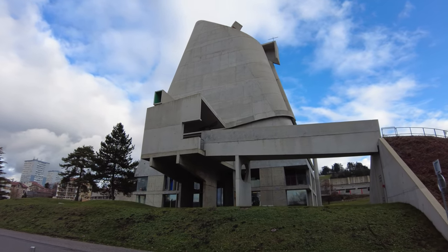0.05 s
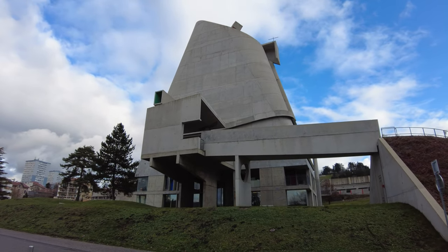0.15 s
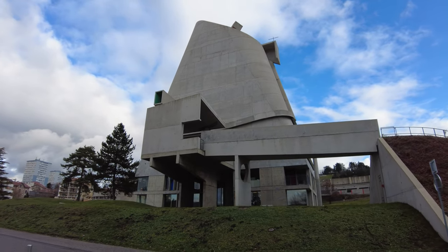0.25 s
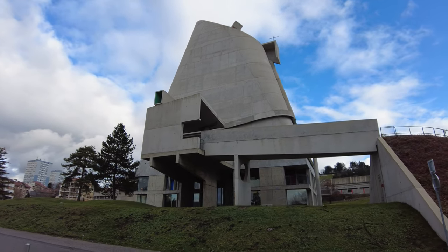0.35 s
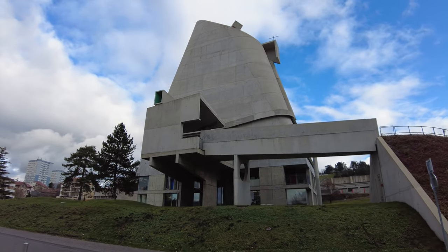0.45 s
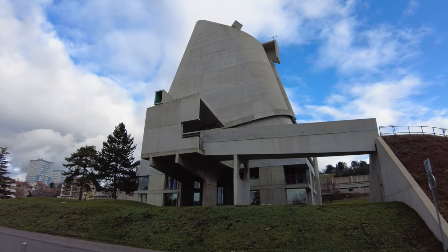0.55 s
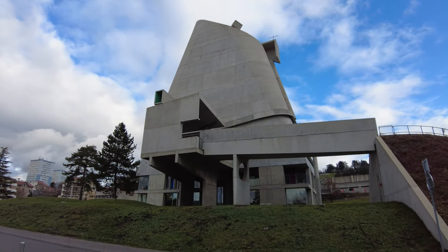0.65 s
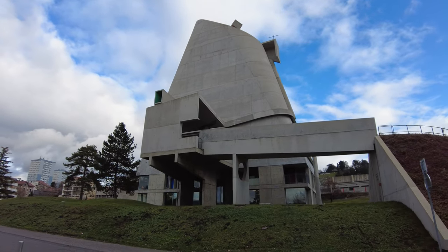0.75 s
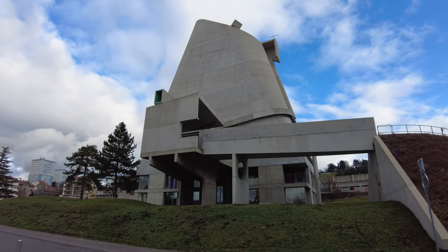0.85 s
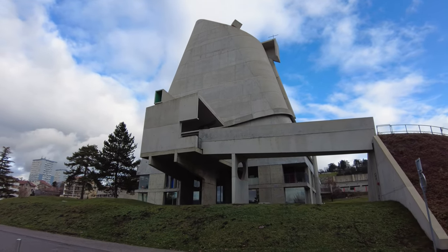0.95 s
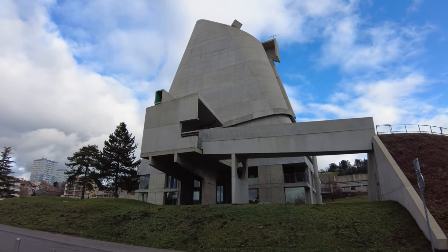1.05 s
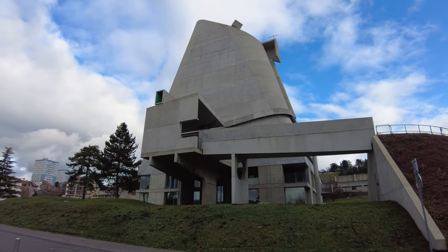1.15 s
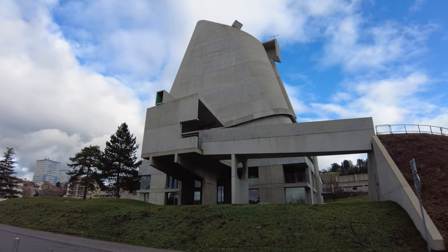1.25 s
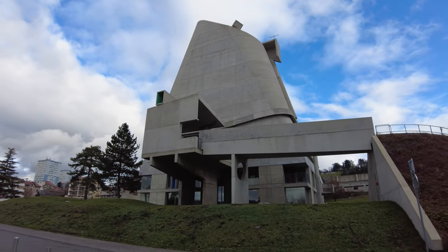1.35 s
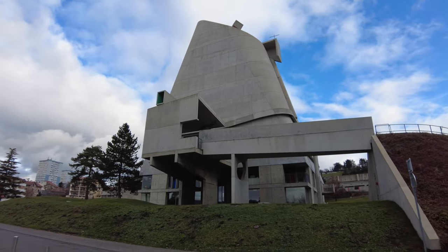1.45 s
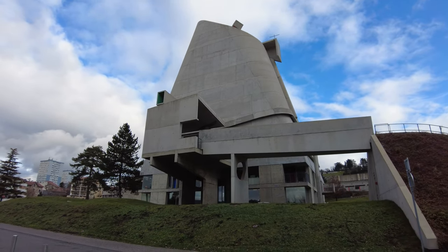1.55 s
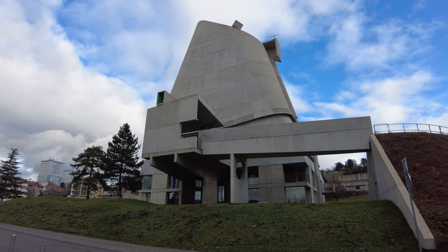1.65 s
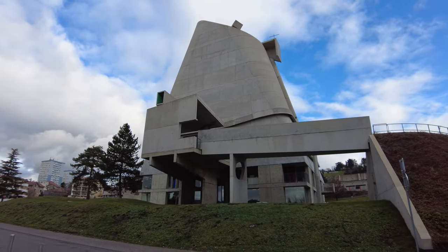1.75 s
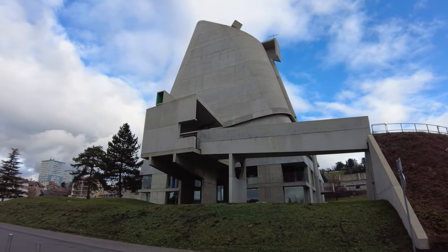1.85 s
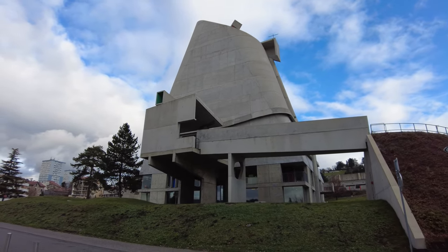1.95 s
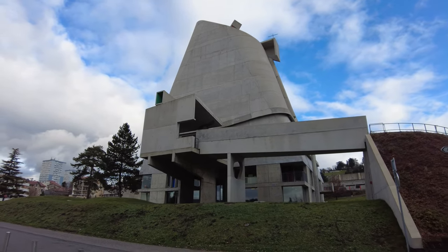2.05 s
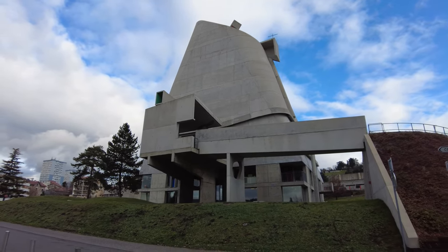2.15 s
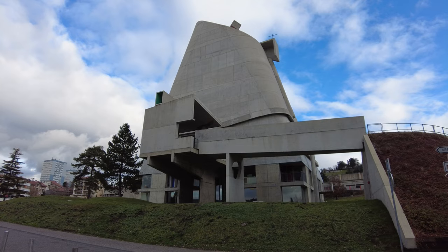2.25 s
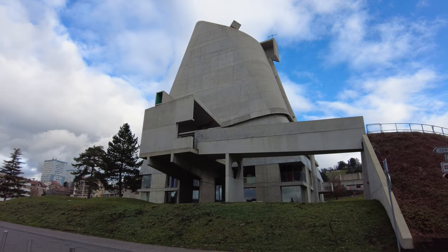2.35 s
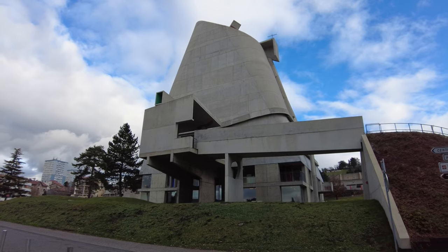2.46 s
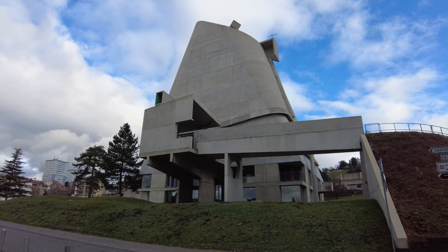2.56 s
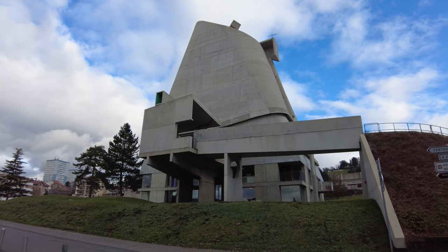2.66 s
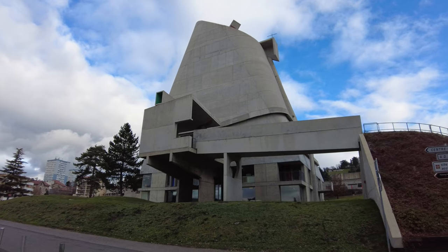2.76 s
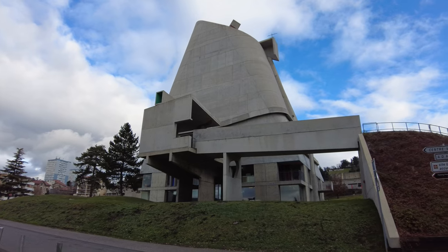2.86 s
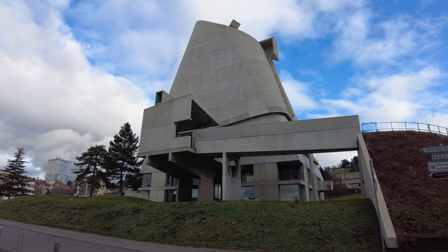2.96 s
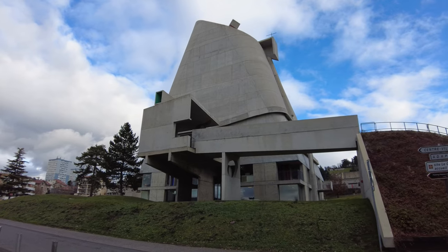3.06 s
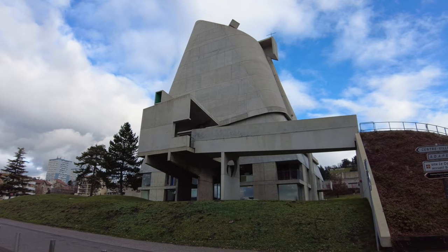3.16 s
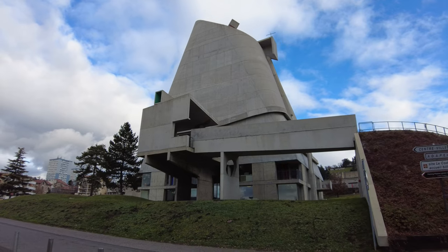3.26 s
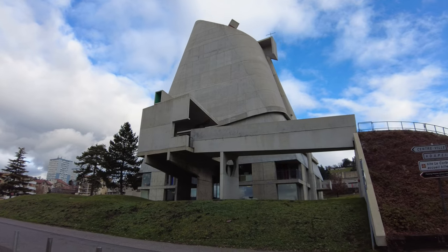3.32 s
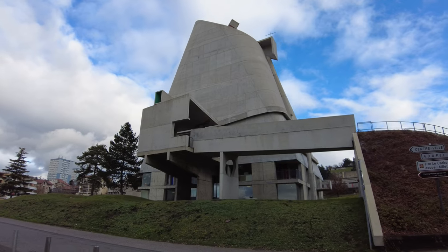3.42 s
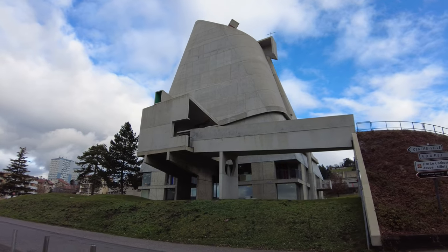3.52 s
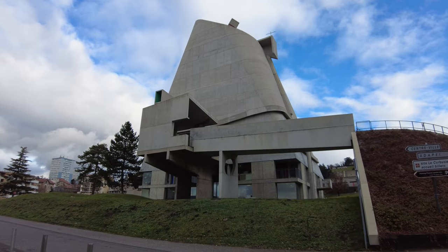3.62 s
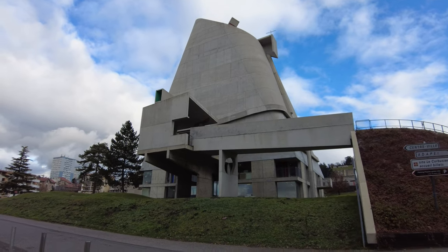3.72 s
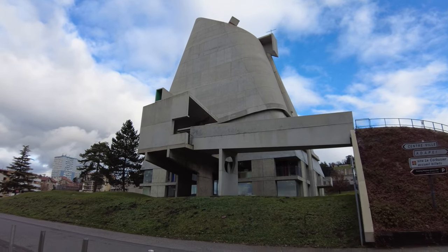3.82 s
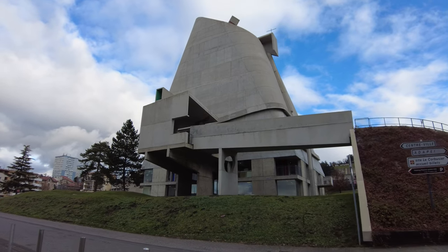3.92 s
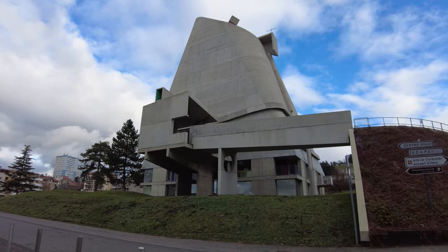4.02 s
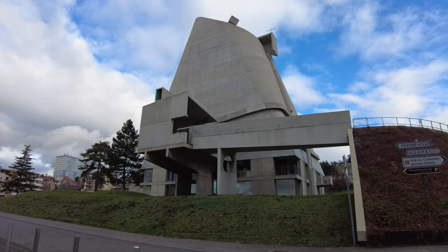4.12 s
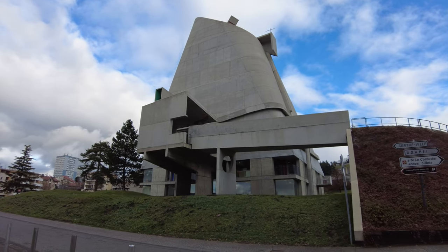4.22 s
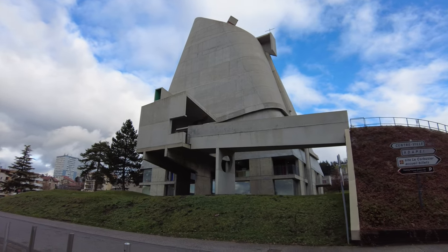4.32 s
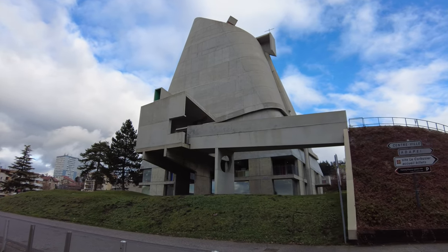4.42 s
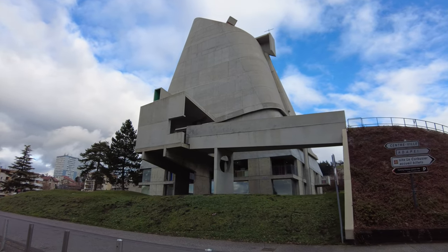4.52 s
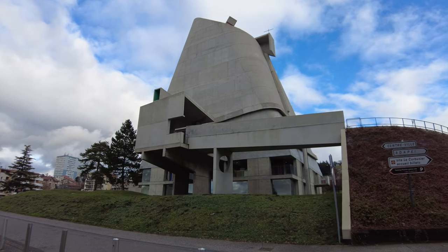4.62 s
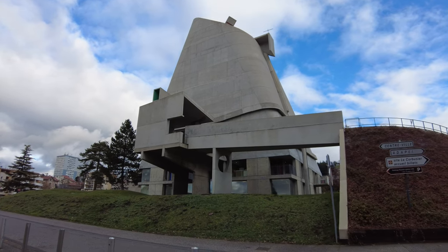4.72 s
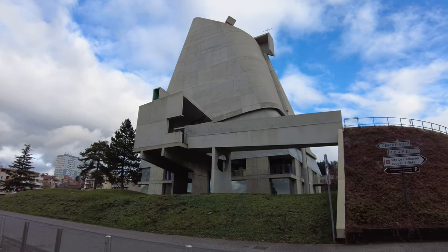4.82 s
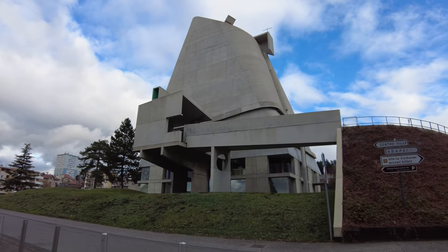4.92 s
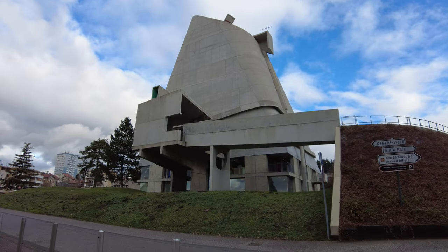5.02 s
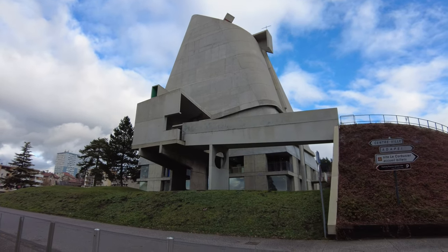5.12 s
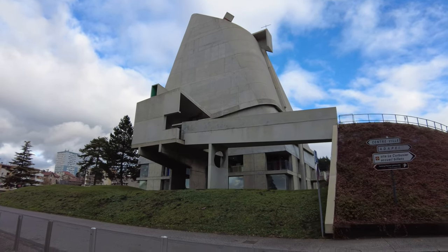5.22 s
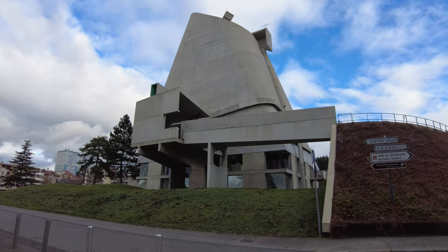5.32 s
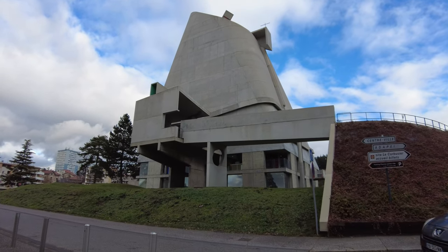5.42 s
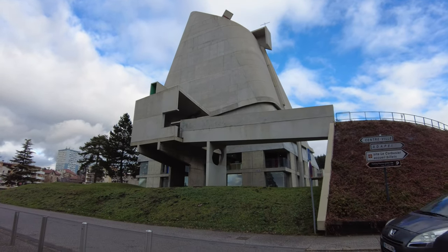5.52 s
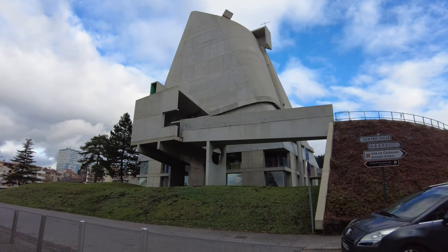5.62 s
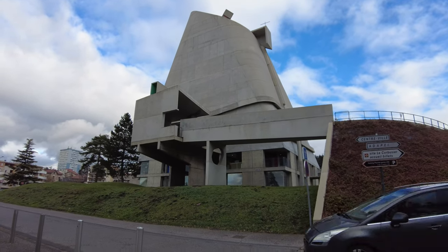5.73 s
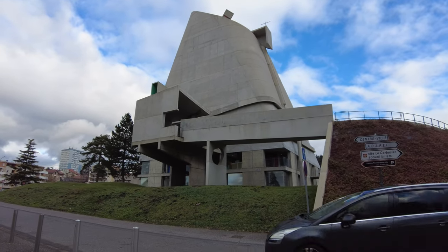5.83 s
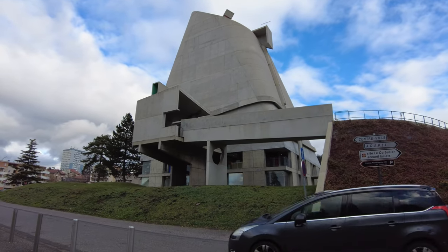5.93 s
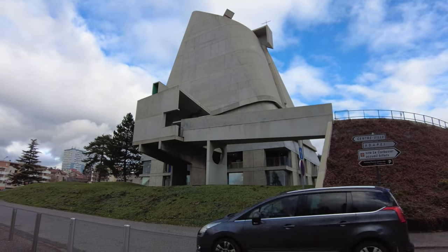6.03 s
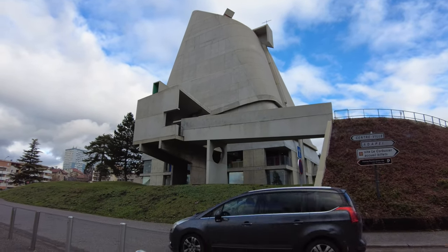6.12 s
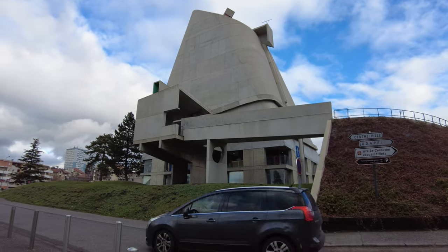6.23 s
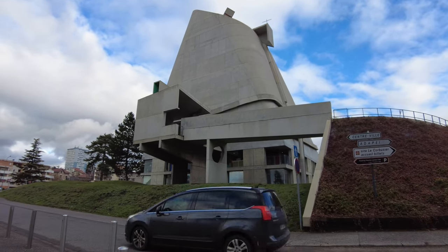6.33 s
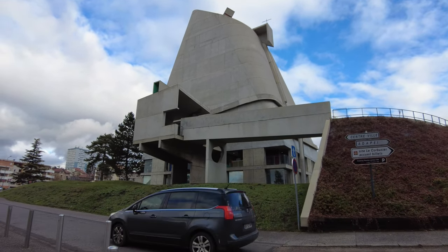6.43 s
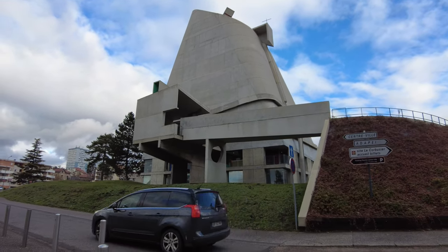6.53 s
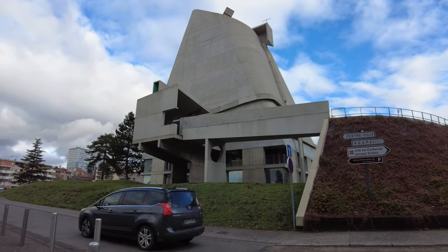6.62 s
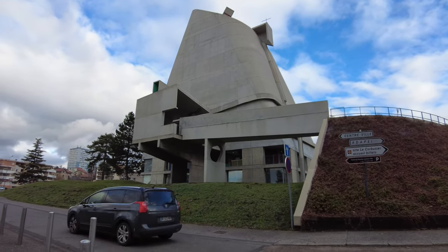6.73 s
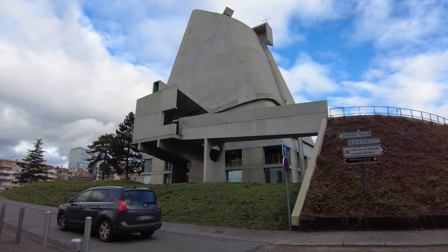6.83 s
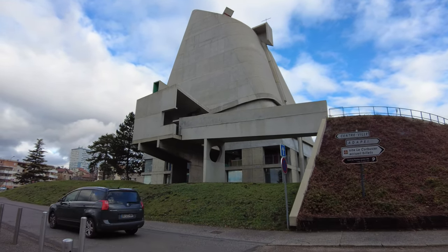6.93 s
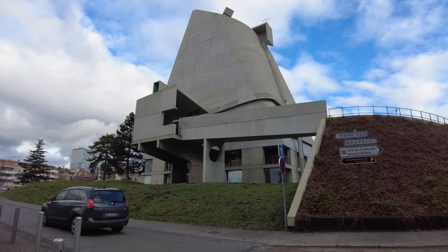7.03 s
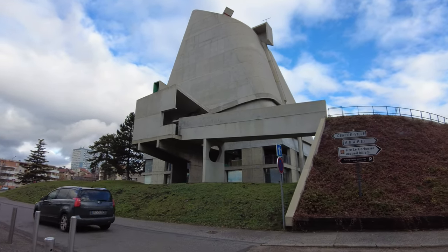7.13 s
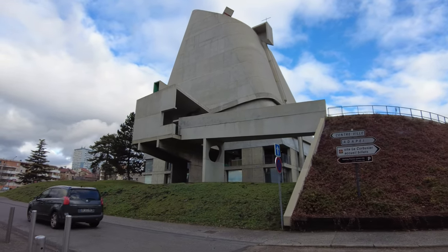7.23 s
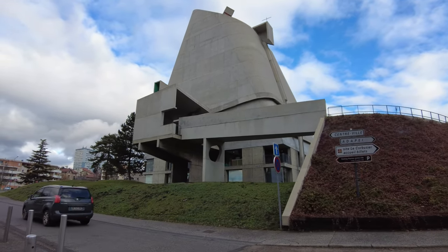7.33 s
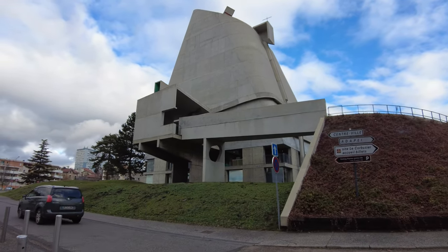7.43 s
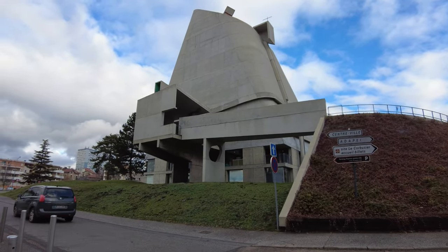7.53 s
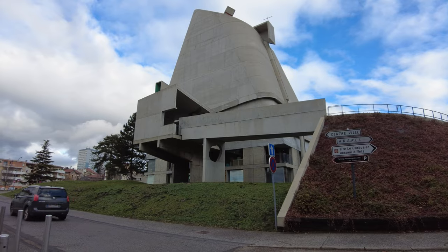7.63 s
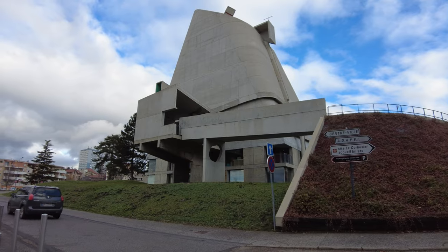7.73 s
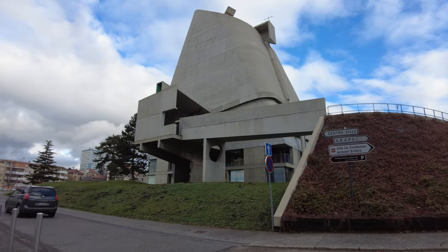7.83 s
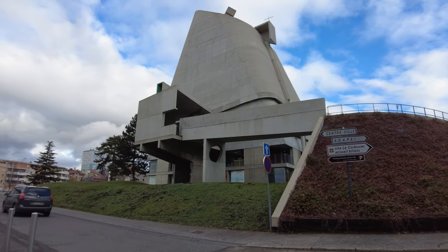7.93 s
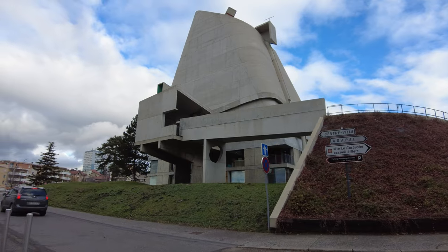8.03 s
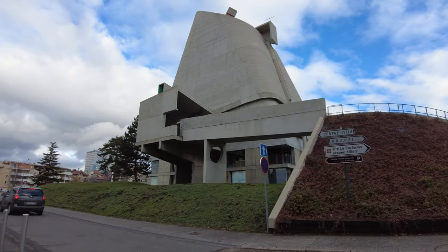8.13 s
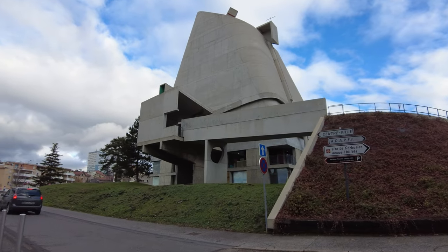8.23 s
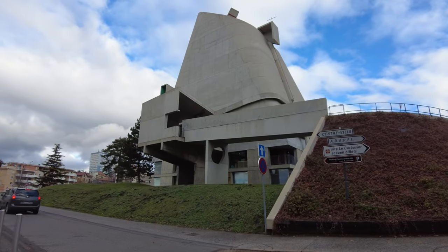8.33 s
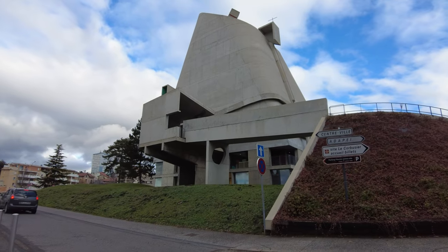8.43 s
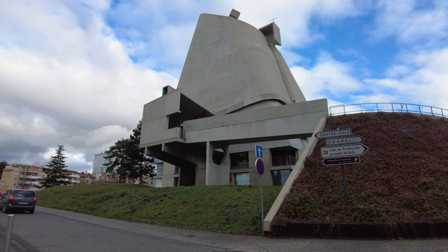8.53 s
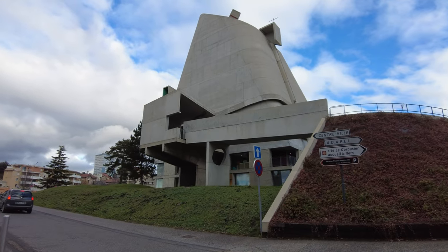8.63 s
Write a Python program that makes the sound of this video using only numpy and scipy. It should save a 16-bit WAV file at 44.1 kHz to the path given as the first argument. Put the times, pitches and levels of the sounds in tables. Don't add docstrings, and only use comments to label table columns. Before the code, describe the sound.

Quiet roadside ambience with faint low wind rumble. Tyre noise and a sinking engine hum slowly build at far right, dotted with small dry clicks of grit. A faint low brake brush leads into two hard metallic clunks less than half a second apart as the car sweeps across to the left. Gusts puff on the small camera's microphones while the roar fades.

```python
import sys
import numpy as np
from scipy import signal
from scipy.fft import rfft, irfft
from scipy.io import wavfile
from scipy.ndimage import uniform_filter1d

SR = 44100
rng = np.random.default_rng(int(sys.argv[2]) if len(sys.argv) > 2 else 0)


def to_wav(sig):
    pcm = np.clip(np.atleast_2d(sig), -1, 1) * 32767
    pcm = np.round(pcm).astype(np.int16)
    wavfile.write(sys.argv[1], SR, pcm.T)


def elevation(decibels):
    levels = np.asarray(decibels, float)
    return 10 ** (levels / 20)


N = 382347
SIZE, HOP = 1024, 256


def curve(table, s):
    first, *columns = np.transpose(table)
    return [np.interp(s, first, c) for c in columns]


def colour(points, hz):
    f, value = np.transpose(points)
    return np.interp(np.log(hz + 1), np.log(f + 1), value)


def evened(x):
    return x / np.sqrt(np.mean(x ** 2) + 1e-20)


def wander(rate_hz):
    f = np.fft.rfftfreq(N, 1 / SR)
    slow = (f > 0) / (1 + (f / rate_hz) ** 4)
    return evened(irfft(rfft(rng.standard_normal(N)) * slow, N))


def split(x):
    return signal.stft(x, SR, nperseg=SIZE, noverlap=SIZE - HOP)


def join(z):
    return signal.istft(z, SR, nperseg=SIZE, noverlap=SIZE - HOP)[1][..., :N]


def add(mix, s, sound):
    part = mix[round(s * SR):][:len(sound)]
    part += sound[:len(part)]


# time_s, bearing (-1 far right, 0 ahead, 1 far left)
CAR_BEARING = [(0, -1.02), (4.4, -1.02), (4.8, -.98), (5.4, -.95), (5.72, -.88), (5.9, -.68), (6.02, -.3),
               (6.15, -.1), (6.4, .05), (6.6, .4), (6.9, .58), (7.3, .66), (8.67, .68)]
# time_s, nearness_db
CAR_NEARNESS = [(0, -56), (1.5, -53), (2.5, -51.5), (3.5, -50), (4.5, -46.5), (5.2, -42.5), (5.8, -41.5),
                (6.0, -42), (6.6, -43), (7.0, -45.5), (7.8, -49.5), (8.67, -52.5)]
ALONGSIDE_DB = -42


def passing(t):
    bearing = curve(CAR_BEARING, t)[0]
    near_db = curve(CAR_NEARNESS, t)[0] - ALONGSIDE_DB
    broadside = np.clip(1 - abs(bearing) / 0.59, 0, 1)
    behind = np.clip(bearing / 0.66, 0, 1)
    return near_db, broadside, behind


# time_s, firing_hz, firing_level_db
ENGINE_SPEED = [(0, 76, -48), (.3, 76.8, -56), (.6, 76.9, -52), (1.15, 76.53, -52.5), (1.5, 76.4, -51),
                (1.9, 75.83, -48), (2.4, 72.66, -44), (3.0, 70.28, -43.5), (3.85, 65.5, -42.5),
                (4.2, 64.86, -37), (4.7, 63.03, -39.5), (5.15, 61.36, -34.5), (5.7, 60.57, -33),
                (6.05, 59.55, -30), (6.9, 59.16, -41), (7.2, 58.02, -38), (7.8, 56.7, -34.5),
                (8.67, 53.5, -39)]
# multiple of the firing rate, level_db
UNEVEN_ORDERS = [(2.75, -7.5), (3, -0.5), (3.25, -5), (3.5, -6.5), (3.75, -2.5), (4, -5), (4.25, -12),
                 (4.5, -8.5), (4.75, -23), (5, -12), (5.5, -11.5), (6, -6.5), (6.5, -8.5)]
# multiple of the firing rate, level_db
TAILPIPE_ORDERS = [
    (.5, -89),
    (1.5, -50.5),
    (3, -55.5),
]


def engine():
    lift_off_s, ramp_s = 2.27, .5
    cruise_order = 3.25
    pipe_hz, pipe_width_hz, pipe_lift_db = 254, 24, 11.0
    boom_hz, boom_width_hz, boom_db = 121.2, 1.4, 8
    uneven_waver_db = 1.5
    t = np.arange(N) / SR
    hz, first_db = curve(ENGINE_SPEED, t)
    near_db, _, behind = passing(t)
    cruise = np.clip((lift_off_s - t) / ramp_s, 0, 1)
    boom = boom_db * np.exp(-((2 * hz - boom_hz) / boom_width_hz) ** 2)
    second_db = -41 + 1.4 * near_db - 30 * cruise + boom
    pipe_db = -47.5 + 0.87 * near_db - 7 * behind ** 2
    turns = 2 * np.pi * np.cumsum(hz * (1 + .001 * wander(4.9))) / SR
    out = elevation(first_db + 1.3 * wander(2.0)) * np.sin(turns)
    out += elevation(second_db + 1.3 * wander(3.6)) * np.sin(2 * turns)
    flutter = wander(1.9)
    for order, db in UNEVEN_ORDERS:
        lift_db = pipe_lift_db / (1 + ((order * hz - pipe_hz) / pipe_width_hz) ** 2)
        cruise_db = -5 * cruise * (order != cruise_order)
        waver_db = uneven_waver_db * np.roll(flutter, rng.integers(N))
        level = elevation(pipe_db + db + lift_db + cruise_db + waver_db)
        out += level * np.sin(order * turns + 2 * np.pi * rng.random())
    for order, db in TAILPIPE_ORDERS:
        waver_db = uneven_waver_db * np.roll(flutter, rng.integers(N))
        out += behind * elevation(db + waver_db) * np.sin(order * turns)
    return np.sqrt(2) * out, turns


# pitch_hz, level_db (per Hz)
TYRE_COLOUR = [(25, -15), (110, -13.5), (170, -20), (260, -9.5), (400, -13.5), (600, -16), (950, -14),
               (1350, -14), (1800, -15), (2150, -22), (3000, -25.5), (4500, -33.5), (8000, -43.5),
               (15500, -53)]


def tyres(turns):
    throb = 1 + 0.027 * np.sin(turns)
    hz, t, z = split(rng.standard_normal((2, N)) * throb)
    near_db, broadside, behind = passing(t)
    roar_db = ALONGSIDE_DB + near_db
    rumble_db = 12 + 0.35 * near_db - 0.5 * broadside - 4.5 * behind
    hum_db = 4.96 + 0.42 * near_db + 5 * broadside + 6.4 * behind
    fizz_db = 3 + 0.09 * near_db + 0.5 * broadside - 3.5 * behind
    octave = np.log2(hz + 1)[:, None]
    low = np.clip((np.log2(500) - octave) / 1.26, 0, 1)
    middle = np.clip(1 - abs(octave - np.log2(640)) / 1.12, 0, 1)
    high = np.clip((octave - np.log2(1800)) / 0.98, 0, 1.5)
    patches = rng.standard_normal(z.shape[::-1][:2]).T
    patches = uniform_filter1d(patches, size=10, axis=0)
    patches = evened(uniform_filter1d(patches, size=12, axis=1))
    flicker = evened(uniform_filter1d(rng.standard_normal(len(t)), size=4))
    shape = elevation(colour(TYRE_COLOUR, hz))
    shape = shape / np.sqrt(np.mean(shape ** 2 * (hz > 900) * (hz < 2000)))
    field_db = roar_db + low * rumble_db + middle * hum_db + high * fizz_db
    field_db = field_db + 0.82 * (1 + 0.68 * high) * patches + 0.55 * flicker * high
    field_db = field_db + 0.87 * (roar_db + 42.5) * np.clip(octave - np.log2(7500), 0, 1)
    field_db = field_db + 4 * behind * np.clip(2 * (np.log2(260) - octave), 0, 1)
    across = (1 + curve(CAR_BEARING, t)[0]) / 2
    delay_s = 0.00091 + (0.00067 - 0.00091) * across
    strength = np.clip(0.017 + (0.39 - 0.017) * across, 0, .6)
    late = np.exp(-2j * np.pi * hz[:, None] * delay_s - (hz[:, None] / 3500) ** 2)
    road = 1 + strength * late
    return join(z * shape[:, None] * road * elevation(field_db))


# peak_s, level_db, half_length_s
WIND_GUSTS = [
    (.3, -42, 0.69),
    (1.597, -40, 0.6),
    (3.1, -50, .4),
    (5.4, -43.5, .25),
    (6.518, -26.5, 0.16),
    (7.396, -29.5, 0.17),
    (8.35, -35.5, 0.48),
]


def wind():
    low = signal.butter(2, [16, 46], "bandpass", fs=SR, output="sos")
    shared, left, right = signal.sosfilt(low, rng.standard_normal((3, N)))
    t = np.arange(N) / SR
    gusts = elevation(-42.5)
    for s, db, half in WIND_GUSTS:
        gusts = gusts + elevation(db) * np.exp(-((t - s) / half) ** 2)
    level = gusts * elevation(-11.0 + 1.5 * wander(1.5))
    return level * evened(shared + elevation(-16.0) * np.array([left, right]))


# start_s, peak_level_db, pitch_hz, width_hz
GRIT_TICKS = [(.4513, -45, 5130, 3000), (0.495, -39, 2300, 900), (.4953, -47, 5170, 1800),
              (.588, -63, 8500, 1997), (1.6244, -45, 5200, 2000), (2.177, -58, 11100, 4014),
              (2.2785, -49, 4590, 1500), (2.2785, -60, 13000, 3000), (2.5756, -46, 2500, 1500),
              (2.779, -45, 5460, 2194), (3.412, -58, 12010, 2002), (3.446, -40.5, 3193, 2000),
              (3.4508, -43, 3500, 2500), (3.934, -42, 5200, 1996), (5.112, -39, 5023, 1500),
              (6.9735, -44.5, 8700, 1280), (7.033, -49, 13000, 4000), (7.038, -52, 12970, 4000),
              (7.058, -51, 6500, 1200), (7.2265, -40, 4500, 2500), (7.2289, -40, 7500, 5000),
              (7.3926, -49, 4980, 1500), (7.592, -59, 9000, 1200), (7.844, -48, 5990, 4000),
              (7.9538, -49, 4970, 2500), (8.0519, -53, 5460, 1500)]


def grit():
    out, t = np.zeros(N), np.arange(512) / SR
    f = np.fft.rfftfreq(512, 1 / SR)
    fade = elevation(-60 * t / .009) * np.minimum(t / .0003, 1)
    for s, db, hz, width in GRIT_TICKS:
        band = np.exp(-((f - hz) / width) ** 2)
        burst = irfft(rfft(fade * rng.standard_normal(len(t))) * band)
        add(out, s - .001, elevation(db) * np.roll(burst, 44) / abs(burst).max())
    return out


# middle_s, half_length_s, level_db, pitch_hz
BRAKE_SQUEAKS = [
    (0.901, 0.09, -64, 3000),
    (1.69, 0.07, -62, 2500),
    (1.82, .1, -67, 2586),
    (5.78, 0.26, -42.5, 800),
]


def brakes():
    width_hz = 90
    t, f = np.arange(N) / SR, np.fft.rfftfreq(N, 1 / SR)
    noise = rfft(rng.standard_normal(N))
    out = np.zeros(N)
    for s, half, db, hz in BRAKE_SQUEAKS:
        whistle = evened(irfft(noise * np.exp(-((f - hz) / width_hz) ** 2), N))
        out += elevation(db) * np.exp(-((t - s) / half) ** 2) * whistle
    return out


# start_s, ring_level_db, ring_pitch_hz, rattle_level_db, thump_level_db
COVER_KNOCKS = [
    (5.997, -25, 760, -55, -45),
    (6.0468, -15, 870, -28, -13),
    (6.052, -20, 387, -34, -14),
    (6.0748, -8, 1000, -20, -28),
    (6.0792, -22, 1150, -19.5, -20),
    (6.4283, -13, 500, -27, -26),
    (6.436, -6, 850, -21, -32),
    (6.4399, -21, 1185, -19, -30),
    (6.4452, -23, 920, -25, -22),
    (6.464, -27, 810, -32, -19),
]
# pitch_hz, level_db (per Hz)
RATTLE_COLOUR = [(150, -2), (350, 1), (800, -14), (1300, -8.5), (1800, -13.5), (3000, -9.5), (5000, -17.5),
                 (8000, -20), (12000, -32), (16000, -36)]


def cover():
    out, t = np.zeros(N), np.arange(8192) / SR
    f = np.fft.rfftfreq(len(t), 1 / SR)
    tone = elevation(colour(RATTLE_COLOUR, f))
    treble = np.log2(np.maximum(f / 2000, 1))
    crest = t - .0022
    for s, ring_db, ring_hz, rattle_db, thump_db in COVER_KNOCKS:
        swings = crest * ring_hz
        swell = np.exp(-(swings / np.where(crest < 0, .85, .55)) ** 2)
        ring = elevation(ring_db) * swell * np.cos(2 * np.pi * swings)
        softness = elevation(.27 * (rattle_db + 19) * treble)
        noise = evened(irfft(rfft(rng.standard_normal(len(t))) * tone * softness))
        rattle = elevation(rattle_db - 60 * t / 0.066) * np.minimum(t / 0.00087, 1) * noise
        sinking = 65 * t * np.exp(-t / 0.29)
        thump = elevation(thump_db - 60 * t / 0.042) * np.sin(2 * np.pi * sinking)
        add(out, s, ring + rattle + thump)
    return out


# pitch_hz, left_lead_radians, left_minus_right_db, lift_db, scattered_share (0 to 1)
PORT_RESPONSE = [(0, 0, 0, 0, .012), (300, 1.05, 0, 0, .02), (480, 1.65, -.8, -3, .025),
                 (680, 2.45, 2, 2, .015), (860, 3.15, 0, 7, .006), (1190, 4.3, -1, 3, .02),
                 (1215, 1.2, -1.5, 1.5, .03), (2000, 1.8, 2, 0, .05), (2550, 1.95, 2, 0, .07),
                 (3000, 2.6, 2, 0, .1), (3500, 3.2, 2, 0, .3), (4300, 4.2, 2, 0, .35),
                 (7000, 6.2, 3, 0, .06), (10000, 7.4, 6, 0, .25), (16000, 12.6, 4, 0, .25)]


def ports(direct, scattered):
    hz, t, (a, b) = split(np.array([direct, scattered]))
    bearing = curve(CAR_BEARING, t)[0]
    lead, tilt_db, lift_db, share = (c[:, None] for c in curve(PORT_RESPONSE, hz))
    hz = hz[:, None]
    shaded = (hz > 1200) & (bearing > 0)
    lead = np.where(shaded, np.minimum(.7 * lead, 1.9), lead)
    share = np.where(shaded & (hz > 3500), .3, share)
    turn = np.exp(.5j * lead * bearing) * elevation(.5 * tilt_db * bearing)
    near, far = np.sqrt(1 - share) * a, np.sqrt(share) * b
    delay_s, centre_hz, width_hz, strength = .00111, 2750, 750, .42
    drift = 1 + .015 * np.interp(t, np.arange(N) / SR, wander(.8))
    late = np.exp(-((hz - centre_hz) / width_hz) ** 4 - 2j * np.pi * hz * delay_s * drift)
    bounce = strength * late * np.clip(-25 * (bearing + .98), 0, 1)
    left = turn * (near + 1j * far) * (1 + bounce)
    right = (near - 1j * far) / turn * (1 - bounce)
    return join(elevation(lift_db * np.minimum(bearing, 0) ** 2) * np.array([left, right]))


def scene():
    drone, turns = engine()
    direct, scattered = tyres(turns)
    breeze = wind()
    side_db = 1.2 * curve(CAR_BEARING, np.arange(N) / SR)[0]
    ticks = grit() * elevation(np.array([side_db, -side_db]))
    squeaks = brakes()
    knocks = cover()
    echo = np.roll(knocks, round(0.0065 * SR))
    car = ports(drone + direct + knocks + squeaks, drone + scattered + echo)
    return car + ticks + breeze


def roll_off(x):
    return signal.sosfilt(signal.butter(12, 16320, fs=SR, output="sos"), x)


def record(dry):
    treble = signal.butter(2, 8000, "highpass", fs=SR, output="sos")
    hiss = signal.sosfilt(treble, rng.standard_normal(N))
    near_db = passing(np.arange(N) / SR)[0]
    wide = dry + elevation(-69.5 + 0.8 * near_db) * hiss
    band_limit = signal.firwin(1023, 15760, window=("kaiser", 9), fs=SR)
    mix = signal.oaconvolve(wide, band_limit[None], "same")
    return roll_off(mix)


dry = scene()
out = record(dry)
to_wav(out)
```